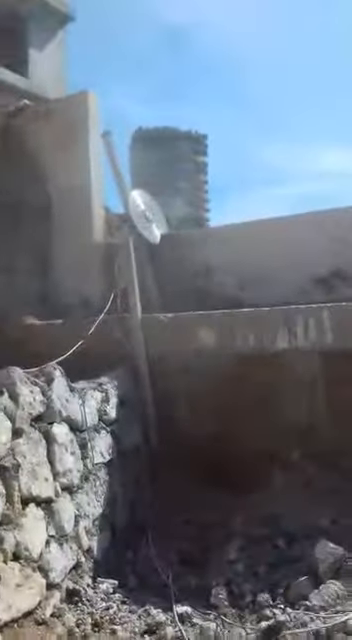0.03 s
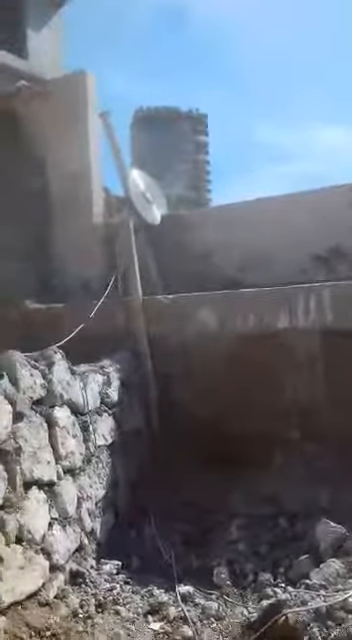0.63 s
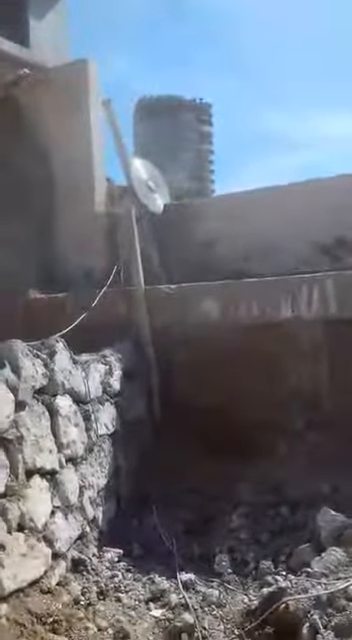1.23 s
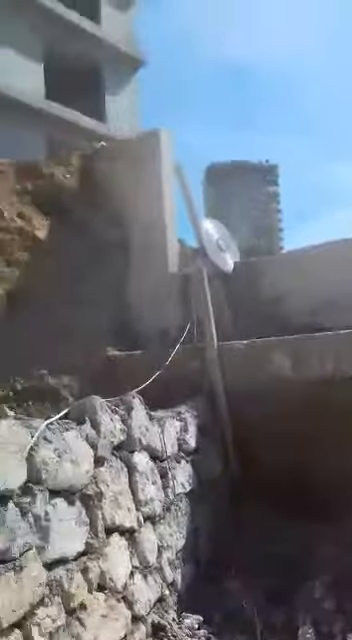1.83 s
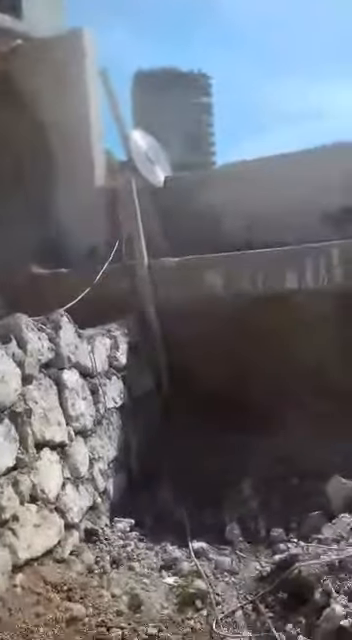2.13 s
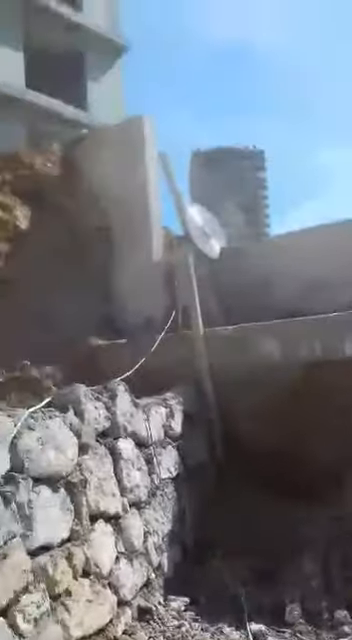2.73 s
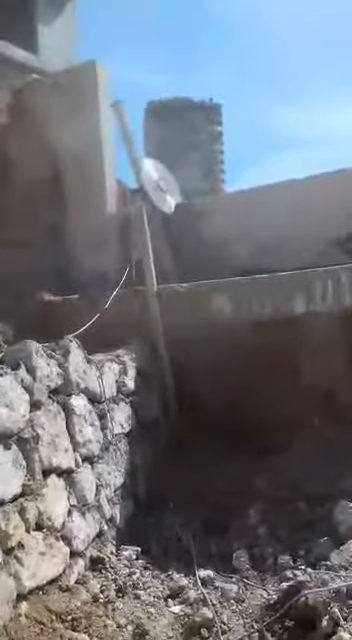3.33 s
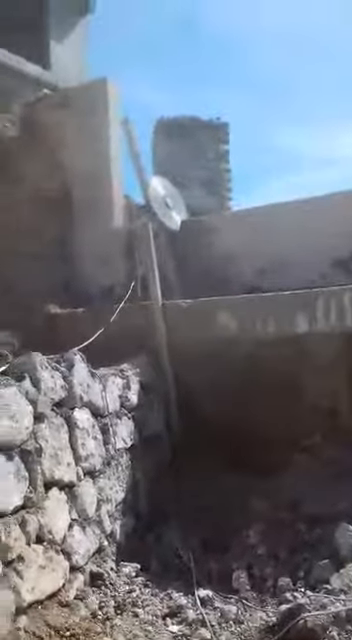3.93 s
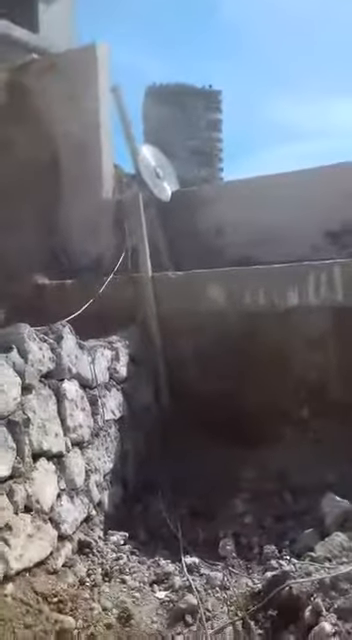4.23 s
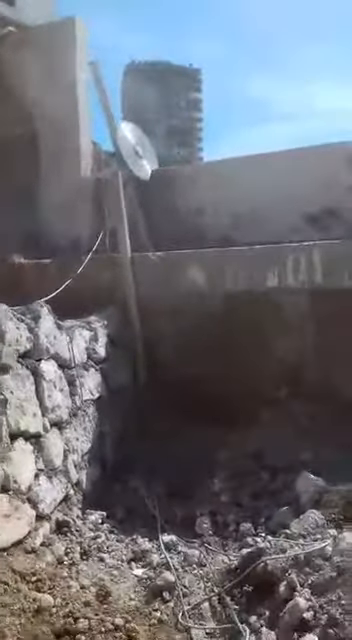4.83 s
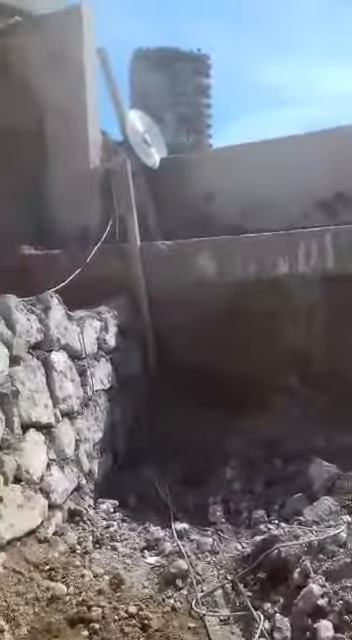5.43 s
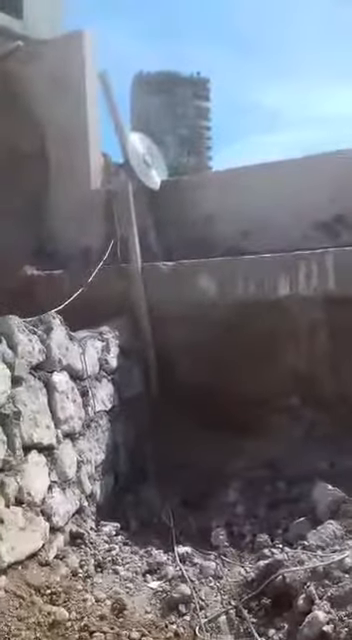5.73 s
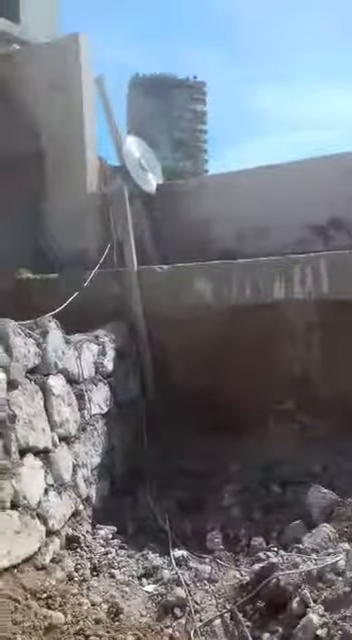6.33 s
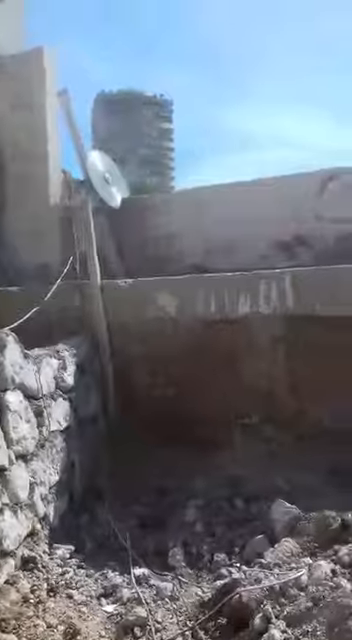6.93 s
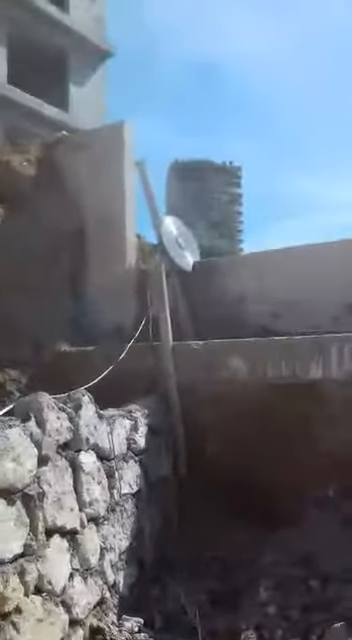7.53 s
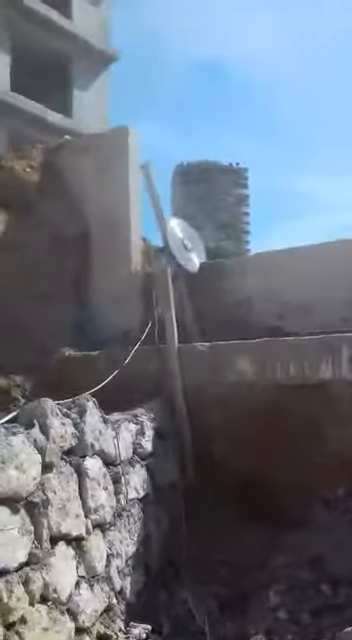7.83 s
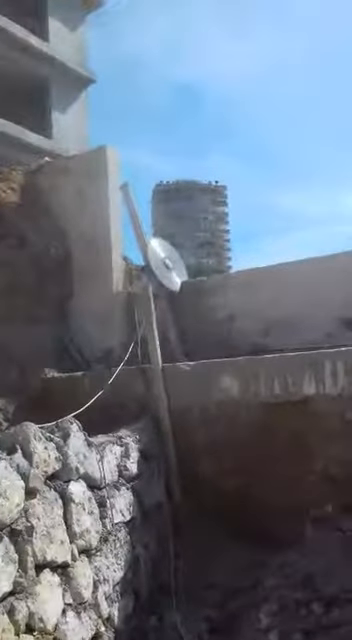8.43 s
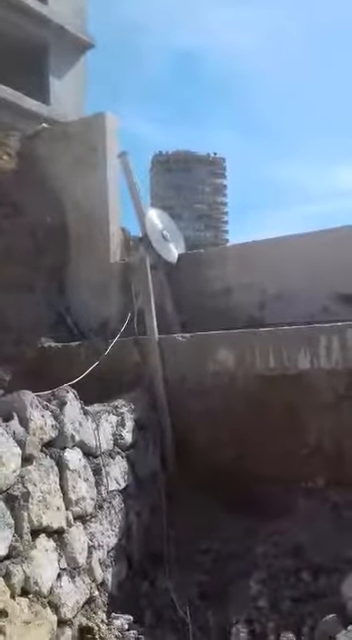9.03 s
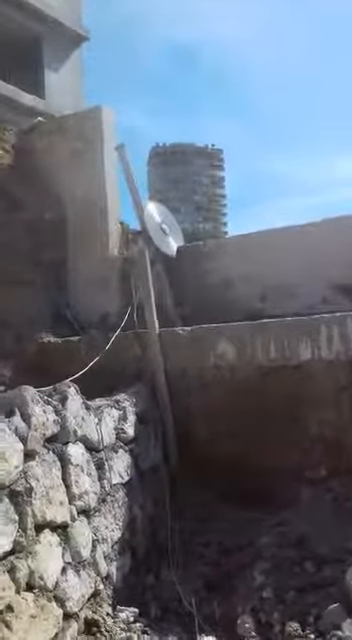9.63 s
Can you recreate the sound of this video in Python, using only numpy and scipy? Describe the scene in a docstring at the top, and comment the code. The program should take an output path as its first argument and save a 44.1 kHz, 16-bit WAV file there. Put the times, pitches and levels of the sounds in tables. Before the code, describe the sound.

An electric saw cuts concrete close to the microphone at an outdoor building site. Its loud, high, chattering shriek runs without a break, shifting in tone as the tool moves. It flares twice early on as the wheel binds, and near the end a rapid metallic pinging joins the grinding. A very faint distant engine and a few soft handling bumps lie underneath.

```python
"""A building site: an electric saw grinds through concrete, its wheel at about 17.5 turns a second.
The rim meets nearly the same grit each turn, so the steel's shriek chatters. Its resonances change as
the tool shifts in the cut; it flares when the wheel binds, ducking the camera's gain. Late on, high
spots on the rim ping once a turn. A distant vehicle changes gear over the rumble of the streets,
and the hand-held camera is bumped."""
import sys
import numpy as np
from scipy import signal
from scipy.fft import rfft, irfft, next_fast_len
from scipy.io import wavfile
from scipy.ndimage import uniform_filter1d, minimum_filter1d, map_coordinates

SR = 44100
rng = np.random.default_rng(int(sys.argv[2]) if len(sys.argv) > 2 else 0)


def unload_wav(signal):
    """Save mono or channel-first audio to the path in sys.argv[1] as 16-bit WAV at rate SR, clipped to [-1, 1]."""
    wavfile.write(
        sys.argv[1],
        SR,
        np.round(np.clip(np.atleast_2d(signal).T, -1, 1) * 32767).astype(np.int16),
    )


N = 426447

# Each row: time in seconds, wheel speed in turns per second.
WHEEL_HZ = [(0, 17.405), (2.8, 17.41), (3.3, 17.47), (5.4, 17.48), (6.1, 17.49), (9.67, 17.49)]
# Seating in the groove. Each row: time in seconds, share of the grinding that repeats each turn.
SEATING_SHARE = [(0, 0.76), (2.6, 0.77), (2.9, 0.03), (3.5, 0.52), (4.5, 0.26), (4.9, 0.23), (5.7, 0.2),
                 (6.2, 0.88), (9.67, 0.34)]
# Push into the cut. Each row: time in seconds, gain in dB.
FEED_DB = [(0, 1), (.35, -1.1), (.52, 2.5), (.8, 0.8), (1.3, -1), (1.42, -0.5), (2.55, -1), (3.2, 0.3),
           (3.75, -1.4), (4.7, .5), (5.05, 0.7), (5.5, 1), (6.75, -.5), (7.7, 0), (8.5, -1.6), (9.67, -1.7)]
# The wheel binds. Each row: start, attack, hold and release in seconds, shriek lift in dB.
BINDS = [(1.477, 0.3, 0.3, 0.37, 10), (2.68, .11, .16, 0.18, 9), (8.838, .08, 0.033, 0.29, 3)]
# Tool positions, in order.
POSITION_NAMES = ("start", "biting", "light", "deep", "seated", "glancing", "late")
# Moves to the next position. Each row: midpoint in seconds, duration in seconds.
TOOL_SHIFTS = [(1.6, .3), (3.09, .15), (4.38, .35), (5.85, .5), (6.88, 0.21), (7.29, 0.06)]
# Base levels by position. Each row: slab growl, lower ring, shriek and edge rasp in dB.
POSITION_DB = [(-37.5, -22, -14.5, -25), (-39, -23, -17, -28), (-38, -22, -17.5, -30.5),
               (-37, -20, -14.5, -31), (-36.5, -20.5, -13.5, -30.5), (-38.5, -18, -17, -30),
               (-37, -24, -14, -29.4)]
# Broad colour of steel on concrete. Each row: frequency in Hz, gain in dB.
BODY_DB = [(60, -40), (500, -37), (850, -36.5), (950, -32), (1500, -25.5), (1850, -30.5), (2300, -18.5),
           (3300, -8.5), (4100, 0.5), (4700, -1.5), (5400, -13), (6500, -23.5), (9000, -39), (15000, -50)]
# Wheel and slab resonances by position, plus broad lifts that set the brightness of the top hiss.
# Each row: centre in Hz, width in Hz, lift in dB.
LIFTS_START = [(603, 30, 16.5), (710, 27, 10), (907, 7.7, 16.5), (1090, 40, 7), (1184, 14, 9.5),
               (1945, 38, 5), (2110, 32, 3), (2233, 20, 11.5), (2460, 490, 12), (2512, 12, 10.5),
               (2887, 670, 16), (3097, 154, 13), (3517, 210, 11.5), (3940, 150, 4.5), (4070, 330, 4.5),
               (4467, 240, 11), (4916, 155, 12), (5250, 120, 7.5), (7280, 150, 7), (8200, 500, 5),
               (13500, 12000, 13)]
LIFTS_BITING = [(616, 110, 5.3), (910, 64, 12.4), (1450, 33, 4.2), (2064, 22, 9.2), (2220, 36, 7.2),
                (2490, 100, 9.1), (2629, 12, 8.4), (2800, 52, 3), (2950, 55, 8.5), (3405, 12, 5.6),
                (3560, 400, 4.6), (3780, 12, 9.2), (3860, 32, 7.1), (4220, 280, 7), (4560, 250, 8.1),
                (4950, 230, 4.5), (5500, 700, 3.4), (7400, 130, 7), (10200, 3800, 9.6)]
LIFTS_DEEP = [(233, 15, 14), (588, 27, 9), (616, 13, 8.1), (694, 48, 10.7), (913, 24, 16.7),
              (1007, 19, 9.7), (1107, 56, 11), (1170, 16, 10.2), (1184, 25, 2.5), (1537, 320, 6.8),
              (1940, 69, 8.8), (2190, 350, 2.4), (2482, 35, 15.2), (2562, 34, 10), (3050, 240, 11.4),
              (3173, 12, 10.2), (3535, 210, 10.4), (3860, 270, 9.3), (4145, 166, 9.5), (4517, 185, 8.9),
              (4923, 220, 7.5), (7430, 780, 7), (10270, 3300, 8.5)]  # light, deep and seated
LIFTS_GLANCING = [(628, 74, 15), (904, 27, 17), (995, 46, 16), (1140, 57, 9), (1500, 410, 9.1),
                  (1860, 130, 11), (2195, 75, 11), (2520, 57, 15.5), (2790, 40, 8.5), (3070, 280, 8.7),
                  (3470, 40, 7), (3530, 220, 7.8), (3850, 200, 8.3), (4830, 180, 8.2), (5600, 210, 3.8),
                  (6300, 240, 2.6), (9000, 2600, 6)]
LIFTS_LATE = [(222, 72, 7), (411, 19, 7.4), (613, 12, 5.8), (710, 63, 4.3), (895, 17.4, 18),
              (1210, 61, 7.4), (1600, 360, 8.2), (1910, 140, 9.9), (2175, 105, 10.8), (2380, 12, 15.4),
              (2568, 85, 9.7), (2794, 15, 7.3), (3123, 220, 9.2), (3626, 50, 6.7), (3866, 100, 5.4),
              (4190, 60, 3.5), (4600, 160, 2.8), (5320, 28, 8.1), (14800, 4200, 4.3)]
# Wheel-locked tones. Each row: rough pitch in Hz, base level in dB, first position, last position.
WHINE_TONES = [(226, -60.5, "start", "start"), (331, -66, "start", "biting"),
               (627, -52.5, "start", "start"), (922, -56, "start", "biting"), (1184, -53, "start", "start"),
               (3917, -28.5, "start", "start"), (4873, -30, "start", "start"),
               (4142, -29, "start", "biting"), (4543, -27.5, "start", "biting"),
               (3864, -29.5, "biting", "biting"), (227, -60, "light", "deep"),
               (629, -51.5, "light", "deep"), (2502, -35, "light", "glancing"),
               (909, -53.5, "light", "late"), (4128, -25.5, "deep", "seated"),
               (3918, -27, "deep", "glancing"), (665, -57, "seated", "glancing"),
               (1172, -43.5, "seated", "glancing"), (997, -55, "glancing", "late"),
               (3095, -33.5, "deep", "late"), (4145, -26, "late", "late"), (4231, -25, "late", "late"),
               (4530, -30, "late", "late")]
# Rim high spots. Each row: place in turns, relative size.
RIM_SPOTS = [(0, 1), (-.11, .4), (-.44, .5)]
# Their strike. Each row: time in seconds, ping peak as a multiple of the shriek's rms.
KNOCK_SIZE = [(7.3, 0), (7.75, 2.4), (8.25, 2.7), (8.4, 3.6), (8.88, 3.6), (9.0, 0)]
# Echoes off the pit walls. Each row: delay in seconds, gain in dB.
WALL_ECHOES = [(.0093, -20), (.0151, -19), (.0237, -19)]
# Camera bumps. Each row: start in seconds, level in dB, centre in Hz, decay in seconds.
CAMERA_BUMPS = [(1.375, -44, 60, .03), (6.675, -45, 170, 0.019), (7.225, -47, 260, .04),
                (8.105, -52, 100, .03)]
# The engine pulls, cruises after changing up, then pulls again. Each row: start and end in seconds,
# initial firing rate in Hz, rise in Hz per second, undertone level in dB.
DRIVING_STRETCHES = [(0, 4.2, 121.3, 9.4, -70), (4.9, 7.2, 117.5, 1.9, -80), (7.5, 9.7, 122, 4.5, -74)]
# Exhaust note. Each row: time in seconds, level in dB.
EXHAUST_DB = [(0, -61), (.6, -55), (1.7, -57.5), (3, -66), (3.6, -60), (4.1, -58), (4.3, -69), (5.1, -58),
              (6, -67), (6.7, -62.5), (9.67, -58.5)]
# Bottom and top bands of the cut. Each row: time in seconds, rumble in dB, dusty hiss in dB.
RUMBLE_HISS_DB = [(0, -52.5, -40.5), (.9, -54.5, -42.5), (2.5, -57, -41), (3.3, -56, -43.5),
                  (3.7, -57, -48), (4.8, -55.5, -46), (6, -62, -48.5), (9.05, -63, -47),
                  (9.67, -65.5, -51.5)]

TIME_S = np.arange(N) / SR


def saw(rasp_per_feed=0.83, rasp_per_bind=0.63, strike_s=8.443):
    """Grinding rings the steel; position sets colour, feed sets level, binding flares shriek and rasp."""
    turns = np.cumsum(curves(WHEEL_HZ)[0]) / SR
    strike_turns = turns - turns[int(strike_s * SR)]
    force = pit_walls(grinding(turns))
    shares = position_shares()
    lifts = (LIFTS_START, LIFTS_BITING, LIFTS_DEEP, LIFTS_DEEP, LIFTS_DEEP, LIFTS_GLANCING, LIFTS_LATE)
    steel = sum(share * unit(ringing(force, rows)) for share, rows in zip(shares, lifts))
    growl_db, ring_db, shriek_db, rasp_db = np.transpose(POSITION_DB) @ shares
    rumble_db, hiss_db = curves(RUMBLE_HISS_DB)
    feed_db, bind_db = curves(FEED_DB)[0], binding_db()
    shriek_db = shriek_db + feed_db + bind_db
    bands = ((150, 400, rumble_db),
             (400, 2050, growl_db + feed_db),
             (2050, 3450, ring_db + feed_db),
             (3450, 5150, shriek_db + rebound_db(strike_turns)),
             (5150, 8500, rasp_db + rasp_per_feed * feed_db + rasp_per_bind * bind_db),
             (8500, 20000, hiss_db))
    cut = sum(undb(db) * steady(band(steel, lo_hz, hi_hz, order=24)) for lo_hz, hi_hz, db in bands)
    return cut + undb(shriek_db) * rim_pings(strike_turns) + whines(turns, shares, feed_db, bind_db)


def grinding(turns, grip_db=1.02):
    """Rim force: grit that returns each turn plus loose chips, pressed unevenly round the wheel."""
    seating = curves(SEATING_SHARE)[0]
    grit = np.sqrt(seating) * groove(turns, places=2520)
    chips = np.sqrt(1 - seating) * rng.standard_normal(N)
    return (grit + chips) * undb(grip_db * groove(turns, places=26))


def groove(turns, places, memory=0.94):
    """Random relief round the rim; each turn wears a little of it into something new."""
    relief = rng.standard_normal((int(turns[-1]) + 2, places))
    for k in range(1, len(relief)):
        relief[k] = memory * relief[k - 1] + np.sqrt(1 - memory ** 2) * relief[k]
    return unit(map_coordinates(relief.ravel(), [turns * places], order=3, mode="nearest"))


def ringing(force, lifts):
    """The force through wheel and slab in one position: resonances plus broad treble lifts."""
    def gain(hz):
        body_hz, body_db = np.transpose(BODY_DB)
        lift_db = sum(db / (1 + (2 * (hz - mid_hz) / width_hz) ** 2) for mid_hz, width_hz, db in lifts)
        return undb(np.interp(np.log(hz), np.log(body_hz), body_db) + lift_db)
    return shape(force, gain)


def position_shares():
    """Share of each tool position per sample; each fades into the next."""
    position = sum(np.clip((TIME_S - mid_s) / length_s + .5, 0, 1) for mid_s, length_s in TOOL_SHIFTS)
    return np.array([np.maximum(1 - abs(position - k), 0) for k in range(len(POSITION_DB))])


def binding_db():
    """Extra shriek while the wheel binds: attack, hold, release."""
    return sum(db * np.interp(TIME_S, start_s + np.cumsum([0, *stages_s]), [0, 1, 1, 0])
               for start_s, *stages_s, db in BINDS)


def whines(turns, shares, feed_db, bind_db, waver_db=0.7, sway_turns=0.00038, shriek_from_hz=3450):
    """Modes on a multiple of the wheel speed sing, louder when well seated and fed."""
    wheel_hz = shares @ curves(WHEEL_HZ)[0] / shares.sum(axis=1)  # mean per position
    seated = curves(SEATING_SHARE)[0] ** 0.42
    out = np.zeros(N)
    for hz, db, first, last in WHINE_TONES:
        held = slice(POSITION_NAMES.index(first), POSITION_NAMES.index(last) + 1)
        gate = shares[held].sum(axis=0) * seated
        harmonic = round(hz / wheel_hz[held].mean())
        drive_db = feed_db + 0.79 * bind_db * (hz > shriek_from_hz)
        per_turn = rng.standard_normal((2, int(turns[-1]) + 2))
        waver, sway = (np.interp(turns, np.arange(len(row)), row) for row in per_turn)
        tone = np.sin(2 * np.pi * harmonic * (turns + sway_turns * sway))
        out += gate * undb(db + drive_db + waver_db * waver) * tone
    return np.sqrt(2) * out


def rim_pings(strike_turns, mode_hz=4250, width_s=0.0019):
    """Each high spot briefly excites the wheel's strongest mode once a turn."""
    wheel_hz = curves(WHEEL_HZ)[0]
    out = np.zeros(N)
    for place_turns, size in RIM_SPOTS:
        age_s = ((strike_turns - place_turns + .5) % 1 - .5) / wheel_hz
        out += size * np.exp(-(age_s / width_s) ** 2) * np.sin(2 * np.pi * mode_hz * age_s)
    return curves(KNOCK_SIZE)[0] * out


def rebound_db(strike_turns, db_per_knock=.45, lag_turns=.28):
    """The main high spot lifts the rim off the cut just after striking, dipping the shriek."""
    return -db_per_knock * curves(KNOCK_SIZE)[0] * np.cos(2 * np.pi * (strike_turns - lag_turns))


def pit_walls(x):
    """Near reflections comb the sound finely."""
    return x + sum(undb(db) * np.pad(x, (int(delay_s * SR), 0))[:N] for delay_s, db in WALL_ECHOES)


def camera_bumps(rise_s=0.0074):
    """Fingers shift on the camera: dull thuds through its case."""
    out = np.zeros(N)
    for start_s, db, hz, decay_s in CAMERA_BUMPS:
        age_s = np.maximum(TIME_S - start_s, 0)
        thud = unit(band(rng.standard_normal(N), hz / 3, hz * 2, order=4))
        out += undb(db) * thud * (1 - np.exp(-age_s / rise_s)) * np.exp(-age_s / decay_s)
    return out


def vehicle(flutter_db=1.9):
    """A far engine pulls, changes up, cruises, pulls again; uneven cylinders add undertones."""
    ramps = []
    for start_s, end_s, hz, rise_hz_per_s, db in DRIVING_STRETCHES:
        ramps += [(start_s, hz, db), (end_s, hz + rise_hz_per_s * (end_s - start_s), db)]
    firing_hz, undertone_db = curves(ramps)
    phase = 2 * np.pi * np.cumsum(firing_hz) / SR
    orders = ((1, curves(EXHAUST_DB)[0]), (3 / 4, undertone_db), (1 / 2, undertone_db))
    return np.sqrt(2) * sum(undb(db + flutter_db * wander(rate_hz=7)) * np.sin(order * phase)
                            for order, db in orders)


def streets(level_db=-70):
    """Low rumble of the streets around, swelling gently."""
    return undb(level_db + wander(rate_hz=0.86)) * unit(band(rng.standard_normal(N), 55, 170, order=3))


def undb(db):
    """Decibels to gain."""
    return 10 ** (np.asarray(db) / 20)


def curves(table):
    """Each column after the time, interpolated per sample."""
    times_s, *columns = np.transpose(table)
    return [np.interp(TIME_S, times_s, column) for column in columns]


def unit(x):
    """Scale to rms 1."""
    return x / np.sqrt(np.mean(x ** 2))


def steady(x):
    """Hold rms near 1 over about four turns, keeping the chatter within each."""
    return x / np.sqrt(uniform_filter1d(x ** 2, size=10100) + 1e-18)


def shape(x, gain):
    """Filter by gain(hz)."""
    size = next_fast_len(N + 8192)
    hz = np.maximum(np.arange(size // 2 + 1) * SR / size, 1)
    return irfft(rfft(x, size) * gain(hz), size)[:N]


def band(x, lo_hz, hi_hz, order):
    """Band-pass whose neighbours add up flat."""
    return shape(x, lambda hz: 1 / (1 + (hz / hi_hz) ** order) - 1 / (1 + (hz / lo_hz) ** order))


def wander(rate_hz):
    """Slow random drift, spread near 1."""
    step = int(SR / rate_hz)
    points = rng.standard_normal(N // step + 2)
    return np.sqrt(3 / 2) * np.interp(np.arange(N), step * np.arange(len(points)), points)


def mic_overload(x, knee=1.0, ceiling=1.75):
    """Linear up to the knee, then rounded off towards the ceiling."""
    over = np.maximum(abs(x) - knee, 0)
    rounded = (ceiling - knee) * np.tanh(over / (ceiling - knee))
    return x - np.sign(x) * (over - rounded)


def gain_control(x, threshold_db=-12.5, ratio=3.1, response_s=0.033):
    """Everything ducks while the running level is over the threshold."""
    pole = np.exp(-1 / (response_s * SR))
    rms = np.sqrt(signal.lfilter([1 - pole], [1, -pole], x ** 2))
    return x * np.maximum(rms / undb(threshold_db), 1) ** (1 / ratio - 1)


def limiter(x, ceiling=.89):
    """A fast, smoothed gain dip eases each peak down."""
    gain = np.minimum(1, ceiling / (abs(x) + 1e-9))
    held = minimum_filter1d(gain, size=45)
    return x * uniform_filter1d(uniform_filter1d(held, size=23), size=23)


def scene():
    """The saw close by, over the quiet town; mono."""
    return (saw() + vehicle() + streets() + camera_bumps())[None]


def record(dry):
    """The loudest flares overload the microphone and duck the gain; peaks are limited, the top is cut."""
    top_hz = 15720
    lowpass = signal.ellip(10, .1, 80, top_hz, fs=SR, output="sos")
    return signal.sosfilt(lowpass, limiter(gain_control(mic_overload(dry))))


dry = scene()
out = record(dry)
unload_wav(out)
```